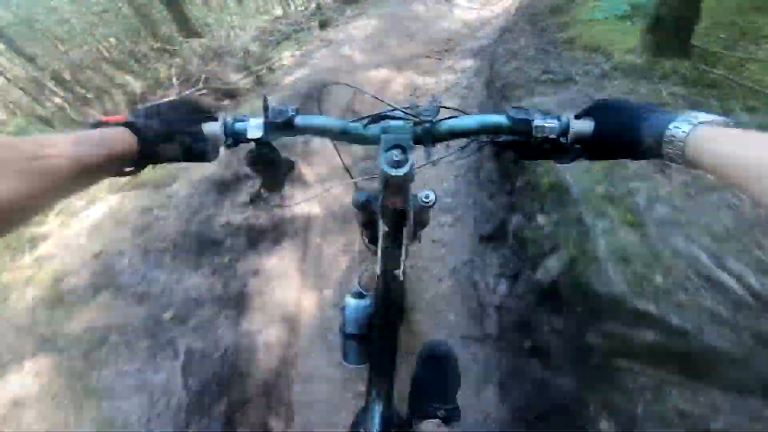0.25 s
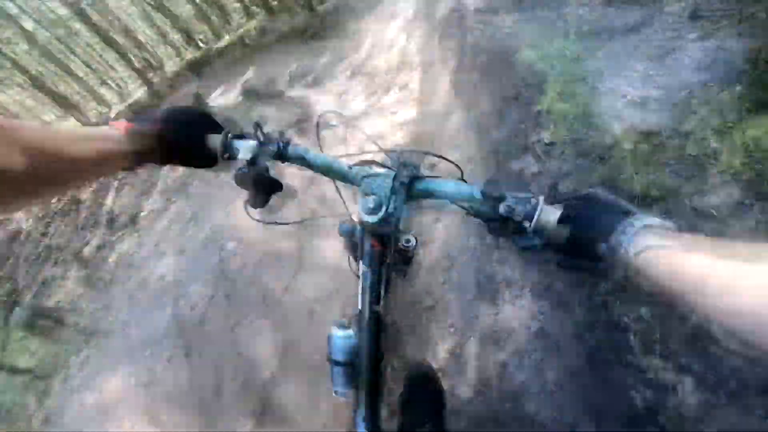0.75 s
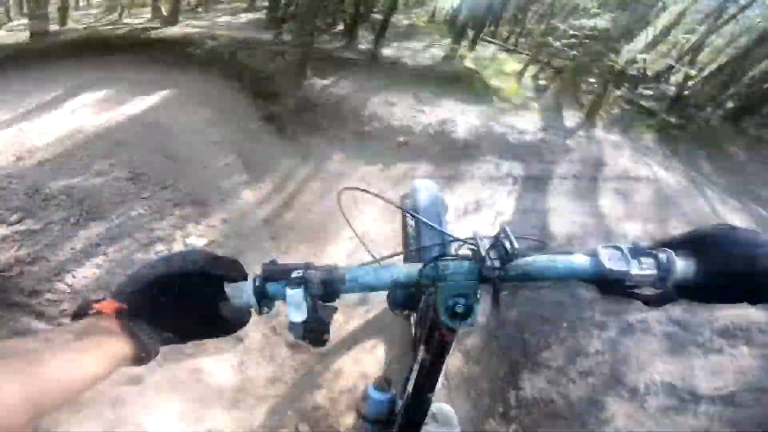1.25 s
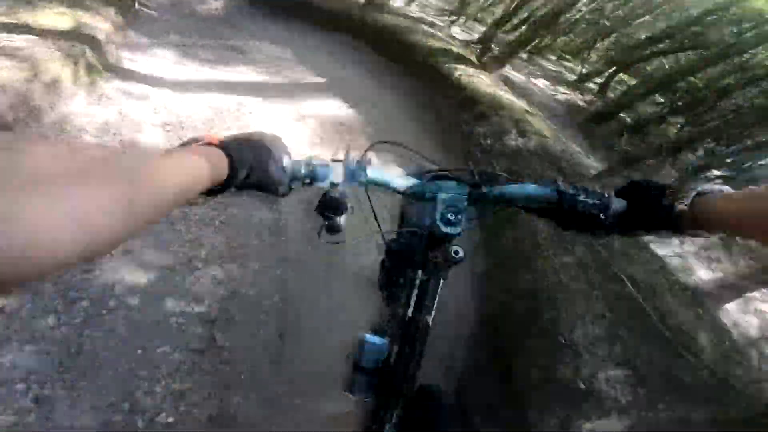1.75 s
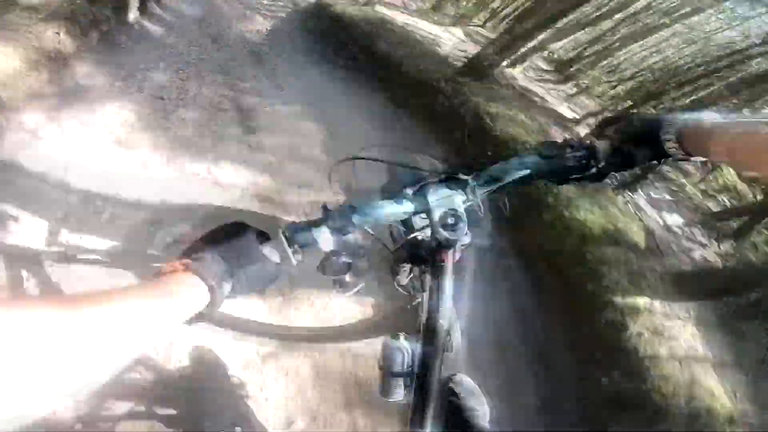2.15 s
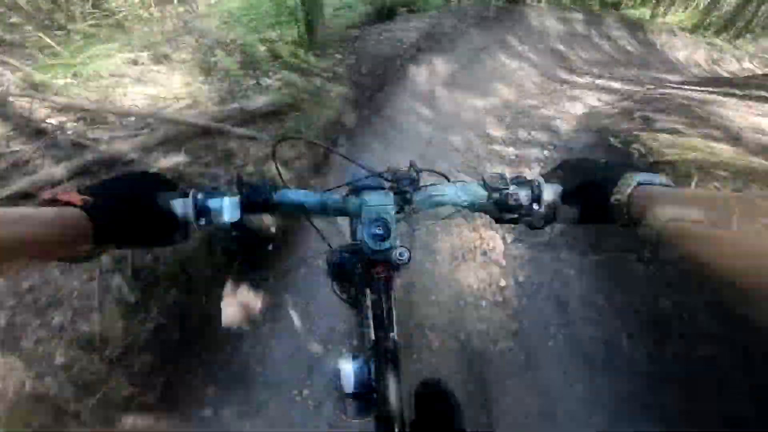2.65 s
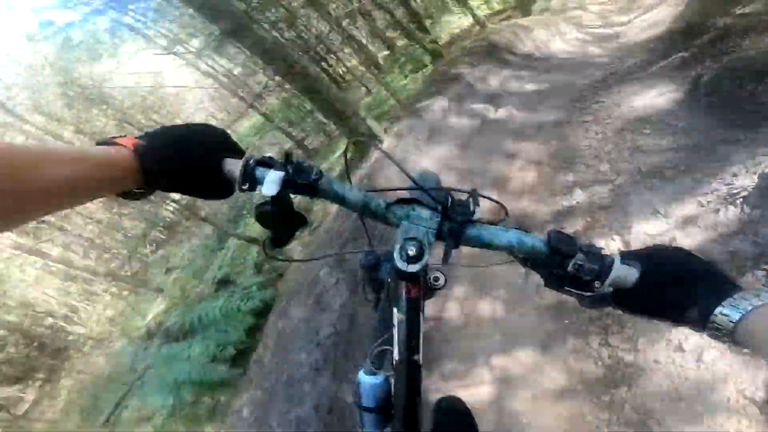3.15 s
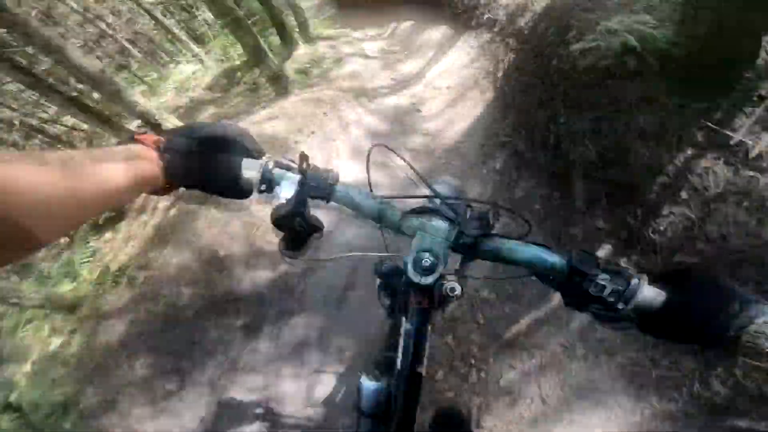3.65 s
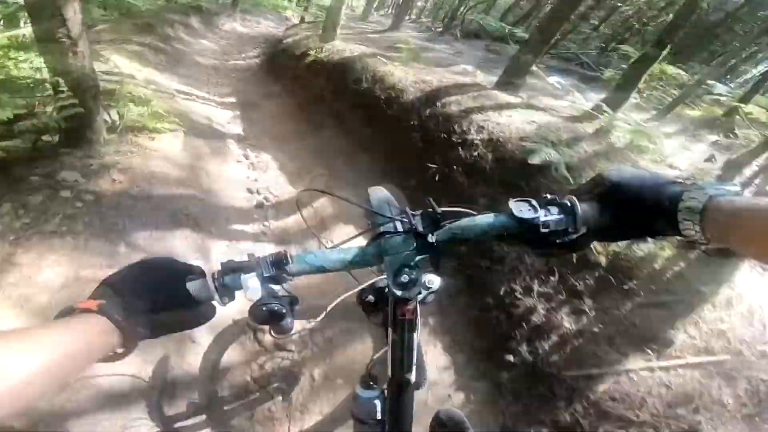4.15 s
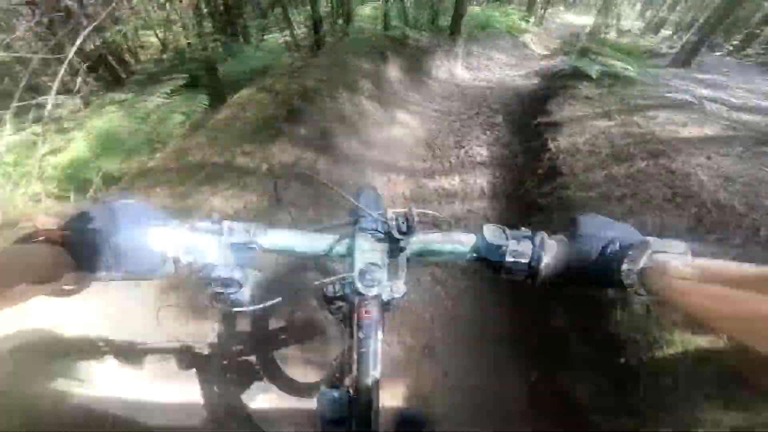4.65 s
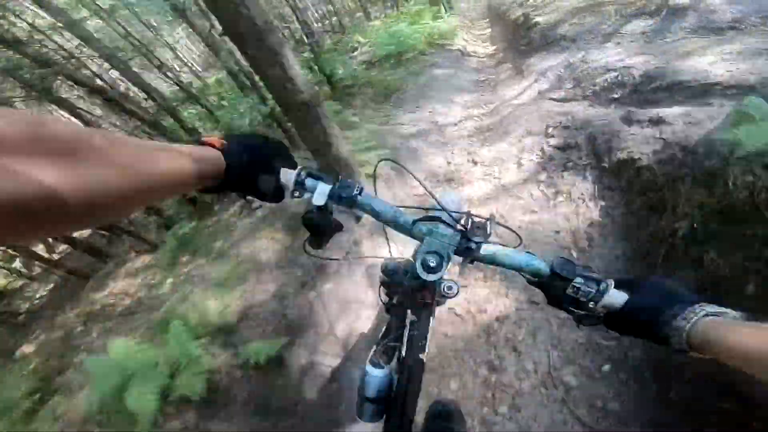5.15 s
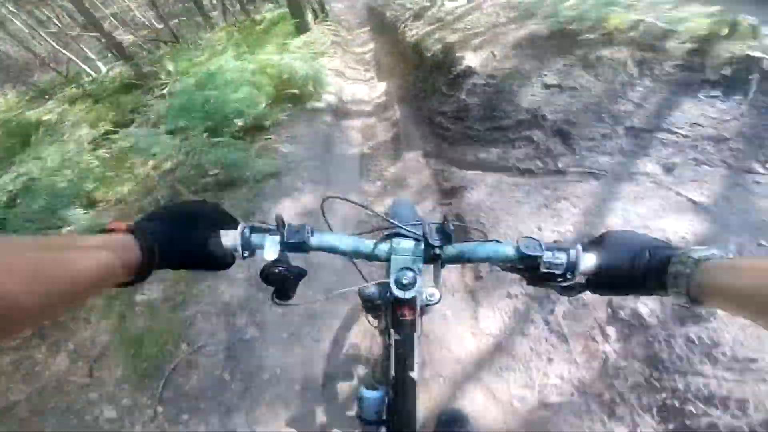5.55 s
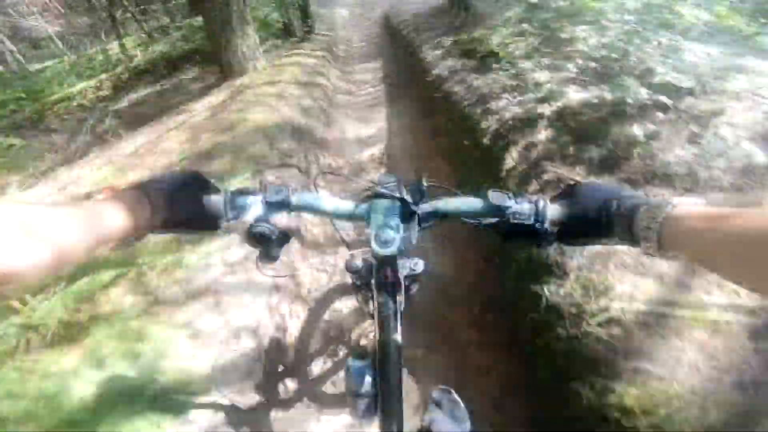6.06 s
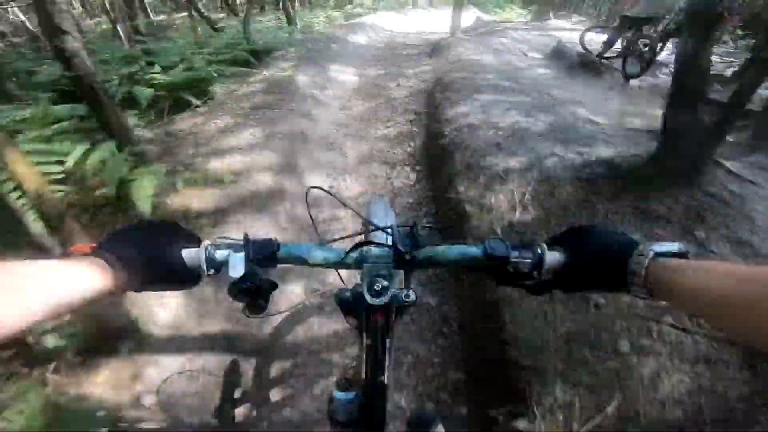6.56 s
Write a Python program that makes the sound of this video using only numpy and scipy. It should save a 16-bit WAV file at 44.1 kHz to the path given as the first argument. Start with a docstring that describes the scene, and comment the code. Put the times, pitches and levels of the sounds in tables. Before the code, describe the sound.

A mountain bike runs fast down a dry woodland trail, heard very close from the rider's chest, without echo. Low, fluttering wind rumble continues throughout, gusting at the start, around 1.8-3 s, 4.5 s and 6 s. Beneath it tyres drum and hum with gritty soil crunch. A sandy scrub and light knocks open; at 0.7-1.1 s sharp frame clacks, crunches and booming wheel hits cluster. From 1.4 to 2.4 s deep short thuds shake the camera, with rapid dry chatter and a low tyre growl in the bend. Around 2.7-3.6 s it is smoother, with wind and brief chatter. Chain and frame clatter returns at 3.75-3.95 s, then hard at 4.4-4.7 s with stones and a faint high brake-disc brush. After a short easing, 5.3-6.4 s brings dense metallic rattling, grit ticks, sandy spray and heavy thumps near 5.5 and 6.35 s, riding on to the end.

```python
"""A mountain bike runs fast down a dry woodland trail, heard from a camera on the rider's chest.
Its knobbly tyres drum, hum and crunch: random tiny impacts and stone clicks, shaped by filters.
Chain and frame clatter as short knocks and noise bursts; wheels boom and parts chatter in the bends.
Grit ticks, stones ping and pads brush the disc. Wind is low filtered noise swelling in gusts,
and bumps shake the camera with deep, short tones."""
import sys
import numpy as np
from scipy import signal
from scipy.fft import rfft, irfft
from scipy.io import wavfile
from scipy.ndimage import uniform_filter1d

SR = 44100
rng = np.random.default_rng(int(sys.argv[2]) if len(sys.argv) > 2 else 0)


def store_wav(level_fs):
    """Save 16-bit WAV to argv[1]."""
    pcm = np.round(np.clip(np.atleast_2d(level_fs), -1, 1) * 32767)
    wavfile.write(sys.argv[1], SR, pcm.T.astype(np.int16))


N = 299439
T = np.arange(N) / SR  # time of every sample, in seconds


def undb(db):
    """Turn decibels into a gain."""
    return 10 ** (np.asarray(db) / 20)


def curves(table):
    """Draw each column of a timed table as straight lines between its points, at every sample."""
    s, *columns = np.transpose(table)
    return [np.interp(T, s, column) for column in columns]


def value_at(s, table):
    """Read a two-column timed table at one moment."""
    return np.interp(s, *np.transpose(table))


def unit(x):
    """Scale to an average (rms) level of 1."""
    return x / np.sqrt(np.mean(x ** 2))


def steady(x, span_s):
    """Even out the slow level changes around an rms of 1, leaving the faster flutter."""
    k = max(int(span_s * SR), 2)
    power = uniform_filter1d(uniform_filter1d(x ** 2, k), k)
    return x / np.sqrt(np.abs(power) + 1e-18)


def walk(rate):
    """Wander between random levels, about `rate` new ones a second, with a spread of 1."""
    k = max(int(SR / rate), 2)
    steps = rng.standard_normal(N)[np.arange(N) // k]
    return unit(uniform_filter1d(steps, k))


def swell(start, hold_s, attack_s, release_s):
    """Gain that rises to 1 at start, holds, then dies away."""
    before = np.minimum(T - start, 0)
    after = np.maximum(T - start - hold_s, 0)
    return np.exp(before / attack_s - after / release_s)


def fade(t, t60):
    """Dying ring that drops by 60 dB in t60 seconds."""
    return np.exp(-np.log(1000) * t / t60)


def colour(x, points, size=4096):
    """Filter to the given (Hz, dB) outline; minimum phase, so nothing sounds before its cause."""
    hz, db = np.transpose(points)
    bins_hz = np.arange(size // 2 + 1) * SR / size
    log_gain = np.log(undb(np.interp(np.log(bins_hz + 1), np.log(hz), db)))
    cepstrum = irfft(log_gain)
    cepstrum[1:size // 2] *= 2
    cepstrum[size // 2 + 1:] = 0
    response = irfft(np.exp(rfft(cepstrum)))
    return signal.fftconvolve(x, response)[:len(x)]


def resonate(x, modes):
    """Ring a set of side-by-side resonances (Hz, width Hz, dB), with alternating signs."""
    out = 0
    for k, (hz, width, db) in enumerate(modes):
        b, a = signal.iirpeak(hz, hz / np.clip(width, 10, 2 * hz), fs=SR)
        out = out + (-1) ** k * undb(db) * signal.lfilter(b, a, x)
    return out


def grains(per_s, spread_db):
    """Scatter tiny one-sample impacts at random; their strengths differ by random decibels."""
    hit = rng.random(N) < per_s / SR
    size_db = spread_db * np.minimum(rng.exponential(size=N), 4)
    return hit * np.sign(rng.standard_normal(N)) * undb(size_db)


def scatter(t, t60, rise_s):
    """A contact breaks into a fast-dying spray of micro-impacts."""
    return rng.standard_normal(len(t)) * fade(t, t60) * (1 - np.exp(-t / rise_s))


def peak(x, db):
    """Scale a blow so that its loudest two milliseconds have this level."""
    return x * undb(db) / np.sqrt(uniform_filter1d(x ** 2, SR // 500).max())


def add(out, s, x):
    """Mix a short sound in at time s."""
    i = max(int(s * SR), 0)
    out[i:i + len(x)] += x[:N - i]


def pebbles(per_s, low_hz, high_hz, cycles, spread_db):
    """Stones click at random moments, each a short ring with its own pitch."""
    out, t = np.zeros(N), T[:SR // 50]
    for when, pitch, size, turn in rng.random((int(per_s * N / SR), 4)):
        hz = low_hz * (high_hz / low_hz) ** pitch
        ring = np.sin(2 * np.pi * (hz * t + turn)) * fade(t, cycles / hz) * (1 - np.exp(-hz * t))
        add(out, when * T[-1], ring * undb(spread_db * size ** 2))
    return unit(out)


# tone of the wind: (frequency [Hz], relative level [dB])
WIND_COLOUR = [(11, -56), (18, -13), (54, 0), (108, 1), (163, -3.5), (272, -16), (338, -23.5), (372, -29.5),
               (408, -27.5), (448, -37), (750, -54.5), (980, -63), (1650, -120)]
# steady air over the microphone, following the rider's speed and posture: (time [s], level [dB])
AIRFLOW = [(0, -20), (.45, -23), (.72, -29), (.95, -28.5), (1.15, -30.5), (1.3, -44.5), (1.665, -36),
           (1.72, -24.5), (2.1, -25.5), (2.4, -26), (3.25, -24), (4.1, -31), (4.45, -24), (4.95, -21),
           (5.3, -23.5), (5.72, -29), (6.02, -20), (6.79, -20)]
# gusts on top of it: (start [s], held for [s], level [dB])
GUSTS = [(0, 0.18, -16.5), (0.521, 0.058, -18.5), (1.819, 0.15, -16), (2.29, 0.038, -23.5),
         (2.48, .54, -16), (3.61, 0.096, -24), (4.54, 0.13, -12), (4.72, 0.11, -17.5), (5.06, 0.068, -18.5),
         (5.879, 0.071, -15.5), (6.1, 0.16, -17), (6.4, 0.35, -19)]
GUST_ATTACK_S, GUST_RELEASE_S = 0.03, 0.031


def wind():
    """Eddies shed by the rider press on the microphone; gusts rise out of the steady airflow."""
    air_db, = curves(AIRFLOW)
    power = undb(air_db) ** 2
    for s, hold, db in GUSTS:
        power = power + (undb(db) * swell(s, hold, GUST_ATTACK_S, GUST_RELEASE_S)) ** 2
    eddies = colour(rng.standard_normal(N), WIND_COLOUR) * undb(walk(40))
    buffeting = undb(walk(18))
    return steady(eddies, span_s=0.077) * np.sqrt(power) * buffeting


# bumps shaking the camera: (time [s], peak level [dB], pitch [Hz])
JOLTS = [(1.412, -26, 70), (1.507, -21, 62), (1.543, -20, 68), (1.637, -31, 85), (1.689, -21, 71),
         (1.741, -25, 66), (2.019, -13, 79), (2.139, -20.5, 84.5), (2.421, -16.5, 85)]
JOLT_T60_S = 0.05


def jolts():
    """A bump shakes the camera: a deep, fast-dying thud."""
    out, t = np.zeros(N), T[:SR // 5]
    for s, db, hz in JOLTS:
        thud = np.sin(2 * np.pi * hz * t) * fade(t, JOLT_T60_S) * (1 - np.exp(-t / 0.0063))
        add(out, s, peak(thud, db))
    return out


# pads brushing the brake disc: (start [s], held for [s], level [dB])
BRUSHES = [(4.527, .05, -46), (4.616, .035, -51)]
DISC_HZ, DISC_WIDTH_HZ = 4130, 330


def disc():
    """The brake pads brush the disc, and the rubbing noise makes it sing faintly."""
    rub = sum(undb(db) * swell(s, hold, 0.0054, 0.0091) for s, hold, db in BRUSHES)
    mode = [(DISC_HZ, DISC_WIDTH_HZ, 0)]
    song = resonate(resonate(rng.standard_normal(N), mode), mode)
    return unit(song) * rub


# single stones pinging off metal: (time [s], peak level [dB], pitch [Hz])
PINGS = [(1.508, -49, 6700), (2.527, -45, 4500), (4.912, -46, 5200)]
PING_WIDTH_HZ, PING_OVERTONE = 710, 1.8  # the overtone is a multiple of the pitch


def pings():
    """A single stone glances off metal and rings two high partials."""
    out, t = np.zeros(N), T[:SR // 10]
    for s, db, hz in PINGS:
        modes = [(hz, PING_WIDTH_HZ, 0), (hz * PING_OVERTONE, 1500, -6)]
        contact = scatter(t, t60=.008, rise_s=.0003)
        add(out, s, peak(resonate(resonate(contact, modes), modes), db))
    return out


# grit ticking on the bike: (time [s], peak level of the tick's main part [dB])
TICKS = [(1.339, -53.5), (2.522, -49.5), (2.621, -51), (2.965, -56), (3.927, -44), (4.031, -50),
         (4.509, -44), (4.548, -53), (4.567, -41), (4.948, -56), (4.991, -55), (5.469, -33), (5.65, -38),
         (5.705, -44), (5.94, -44.5), (6.278, -37.5), (6.349, -34.5), (6.379, -38.5), (6.528, -43.5),
         (6.701, -44.5)]
# tone of a tick: (frequency [Hz], relative level [dB])
TICK_COLOUR = [(2000, -12), (3400, -5), (4200, 1), (5200, -1.5), (6400, 4), (7200, -2.5), (8400, -4),
               (10000, -24), (11500, -59.5)]
# sparkle of a typical tick (before the treble curve is added), and its growth with strength
TICK_TYPICAL_DB, TICK_SPARKLE_DB, TICK_SPARKLE_DB_PER_DB = -45, -57.5, 0.86


def grit():
    """Sprays of small stones tick against the bike, with a sparkle that follows the treble curve."""
    out, t = np.zeros(N), T[:SR // 8]
    for s, db in TICKS:
        contact = scatter(t, t60=.04, rise_s=.002)
        sparkle_db = TICK_SPARKLE_DB + TICK_SPARKLE_DB_PER_DB * (db - TICK_TYPICAL_DB)
        sparkle_db += value_at(s, TOP_TREBLE)
        add(out, s, peak(colour(contact, TICK_COLOUR), db))
        add(out, s, peak(colour(contact, DUST_COLOUR), sparkle_db))
    return out


# runs of dry chatter through the bends:
# (start [s], strongest at [s], end [s], time between taps [s], peak level when strongest [dB])
CHATTER = [(1.400, 1.43, 1.66, .0283, -45.5), (2.712, 2.78, 2.87, .069, -45),
           (3.104, 3.225, 3.34, .0258, -41.5), (3.452, 3.452, 3.515, .0256, -48),
           (3.547, 3.547, 3.585, .025, -41)]
# tone of a tap: (frequency [Hz], relative level [dB])
CHATTER_COLOUR = [(450, -30), (780, -3), (1050, -9), (1380, 3), (1650, 1), (2000, -9), (2330, -4),
                  (2900, -19), (3950, -7), (4500, -13), (6000, -18), (8000, -48), (11000, -70)]
CHATTER_FADE_DB_PER_S = 34  # on both sides of the strongest moment
CHATTER_RISE_S, CHATTER_T60_S = .004, .02
CHATTER_JITTER_S, CHATTER_SCATTER_DB = .0006, .7


def chatter():
    """One part scuffs against another at a nearly even rate, swelling and fading as the bike leans."""
    out, t = np.zeros(N), T[:SR // 20]
    for start, strongest, end, period, db in CHATTER:
        for s in np.arange(start, end, period):
            late, harder = rng.standard_normal(2)
            tap = colour(scatter(t, CHATTER_T60_S, CHATTER_RISE_S), CHATTER_COLOUR)
            tap_db = db + CHATTER_SCATTER_DB * harder - CHATTER_FADE_DB_PER_S * abs(s - strongest)
            add(out, s + CHATTER_JITTER_S * late, peak(tap, tap_db))
    return out


# ring of frame and drivetrain: (frequency [Hz], width [Hz], level before random scatter [dB])
FRAME = [(880, 42, -0.5), (1320, 100, 1.5), (1680, 58, 9.5), (2250, 220, -0.5), (2983, 70, -3),
         (4170, 360, -11)]
MODE_SCATTER_DB = 2
# tones of the crack and of the clashing links: (frequency [Hz], relative level [dB])
CRACK_COLOUR = [(700, -29), (1400, -7.5), (2400, 9.5), (3200, -1), (4100, 3.5), (5000, -13.5), (8000, -35)]
STEEL_COLOUR = [(1800, -12.5), (2800, -0.5), (3400, 0.5), (4100, 11), (4800, 6), (6200, 3), (7200, -11),
                (8500, -20), (10500, -31.5), (13000, -38), (16000, -52.5)]


def knock(db, bright_db, hz, t60, crack_db):
    """A hard part hits its stop: a tock, a crack, ringing tubes and a bright clash of links."""
    t = T[:SR // 4]
    tock = np.sin(2 * np.pi * hz * t) * fade(t, 0.02) * (1 - np.exp(-t / 0.00044))
    crack = colour(scatter(t, t60=.012, rise_s=.0005), CRACK_COLOUR)
    contact = scatter(t, t60, rise_s=.0005)
    # each blow lands elsewhere, so it rings the tubes in a different balance
    modes = [(f, width, mode_db + MODE_SCATTER_DB * rng.standard_normal()) for f, width, mode_db in FRAME]
    body = unit(resonate(contact, modes)) + 0.55 * unit(colour(contact, CRUNCH_COLOUR))
    clash = colour(contact, STEEL_COLOUR)
    hard = peak(tock, db - 3.0) + peak(crack, db + crack_db - 12.0)
    return hard + peak(body, db + crack_db - 9.0) + peak(clash, db + bright_db - .5)


# chain and frame clattering on bumps; knock() sets each part of the blow a few dB lower:
# (time [s], strength [dB], brightness relative to it [dB], pitch of the struck part [Hz],
#  t60 of the clash [s], crack relative to the strength [dB])
CLATTERS = [(0.054, -39, -12, 800, 0.06, 10), (0.114, -46.5, 12, 1140, 0.095, -1),
            (0.273, -37, -7, 1600, 0.067, 1), (0.683, -43, -9, 1500, .04, 4),
            (0.734, -40.5, -10, 1190, 0.035, 0), (0.776, -45, -6, 1900, .025, -1),
            (0.798, -27.5, -6, 2020, 0.045, 3.5), (0.845, -31, -20, 1060, 0.034, -4),
            (0.884, -35.5, -12, 980, 0.027, -5), (0.951, -30.5, -16, 703, .06, -8),
            (0.956, -33, -16, 620, 0.059, -6), (1.042, -46, -8, 1280, 0.044, 2),
            (1.143, -50, -9, 1510, .07, 6), (1.199, -45, -13, 1200, .04, 3),
            (1.289, -45.5, -11, 1000, 0.14, -10), (1.628, -38.5, -2, 1650, 0.045, 5),
            (1.706, -39.5, -16, 1200, 0.094, 4), (1.748, -43.5, -5, 1390, 0.078, 4),
            (3.745, -36.5, -10, 790, 0.06, 1), (3.758, -35.5, -9, 910, 0.076, -4),
            (3.794, -42, -5, 2410, .07, 0), (3.815, -40.5, -8, 1404, 0.083, 6),
            (3.844, -30, -24, 854, 0.021, 5.5), (3.847, -28, -27, 830, 0.051, -6),
            (3.919, -35, -7, 1710, 0.095, 4.5), (3.951, -42, -7, 1310, .03, -1),
            (4.194, -46, -6, 834, .05, -6), (4.343, -46, 0.5, 1290, 0.04, 6),
            (4.433, -31.5, -5.5, 1660, 0.05, 2), (4.438, -33, -6, 1490, 0.062, 7),
            (4.472, -34, -7, 1060, 0.07, 4), (4.501, -36, -13, 1636, .04, 3),
            (4.511, -31, -20, 980, 0.032, 1), (4.526, -39, -17, 1900, .03, 1),
            (4.539, -41, -12, 1750, .03, -2), (4.551, -42, -14, 1130, .025, -4),
            (4.5763, -22, -24, 1200, 0.019, -15), (4.614, -34, -7, 860, 0.034, 1),
            (5.252, -45, -1.5, 1520, 0.03, 4), (5.315, -36.5, -3.5, 1100, 0.046, 4),
            (5.37, -33, -22, 945, 0.044, -15), (5.41, -37, 2, 780, 0.045, 4),
            (5.471, -20.5, -16, 1270, 0.03, -2), (5.487, -38, -10, 1110, .03, 3),
            (5.562, -39, -7, 1260, 0.032, 0), (5.604, -37.5, -2, 800, .04, 1),
            (5.661, -30, -5, 1040, 0.041, 3.5), (5.723, -36.5, -4, 1310, 0.029, -4),
            (5.773, -35.5, -7.5, 1550, 0.17, -3), (5.809, -42, -0.5, 1410, .06, -1),
            (5.944, -42.5, 0, 1530, 0.066, 8), (6.064, -37, -5, 1310, .05, 3),
            (6.079, -36, -6, 890, .04, 1), (6.117, -35.5, -2.5, 819, 0.03, 0),
            (6.216, -32, -6.5, 1400, 0.071, -2), (6.348, -31.5, -14, 890, 0.11, 1.5),
            (6.361, -35, -16, 1350, 0.037, -3)]
# lighter rattles fall at random, louder on looser ground
RATTLES_PER_S, RATTLE_OVER_GROUND_DB, RATTLE_SPREAD_DB, RATTLE_T60_S = 3.4, -1.5, 3, 0.074


def clatter():
    """Loose parts knock hard on the bumps; lighter rattles fall at random."""
    out = np.zeros(N)
    for s, db, bright_db, hz, t60, crack_db in CLATTERS:
        add(out, s, knock(db, bright_db, hz, t60, crack_db))
    for when, pitch, size in rng.random((int(RATTLES_PER_S * N / SR), 3)):
        s = when * T[-1]
        db = value_at(s, GROUND) + RATTLE_OVER_GROUND_DB + RATTLE_SPREAD_DB * (2 * size - 1)
        add(out, s, knock(db, bright_db=-3.5, hz=800 * 2 ** pitch, t60=RATTLE_T60_S, crack_db=-0.5))
    return out


# wheels striking roots and hollows: (time [s], peak level [dB])
THUMPS = [(0.809, -20.5), (0.949, -16), (1.288, -31), (1.424, -32), (1.498, -33), (4.576, -24),
          (4.665, -20), (5.45, -18), (5.472, -17), (6.346, -14.5)]
# ring of a struck tyre and rim: (frequency [Hz], t60 [s], relative level [dB])
WHEEL = [(223.4, 0.11, 1.5), (324, 0.049, 9), (398.4, 0.087, -3), (460, 0.013, -15), (634, 0.016, -18)]


def thumps():
    """A wheel hits an edge and booms as tyre and rim ring together."""
    out, t = np.zeros(N), T[:SR // 4]
    ring = sum(undb(db) * np.sin(2 * np.pi * hz * t) * fade(t, t60) for hz, t60, db in WHEEL)
    boom = ring * (1 - np.exp(-t / 0.0044))
    for s, db in THUMPS:
        add(out, s, peak(boom, db))
    return out


# side knobs growling on the banked turn: (start [s], held for [s], level [dB])
BERM = [(1.85, 0.48, -55), (2.5, 0.21, -50)]
BERM_HZ, BERM_WIDTH_HZ = 570, 280


def berm():
    """Leaned into the banking, the side knobs scrub with a low growl."""
    lean = sum(undb(db) * swell(s, hold, 0.035, 0.048) for s, hold, db in BERM)
    band = [(BERM_HZ, BERM_WIDTH_HZ, 0)]
    growl = resonate(resonate(grains(per_s=700, spread_db=2.0), band), band)
    return unit(growl) * lean


# stony stretches of trail:
# (start [s], end [s], stones per second [1/s], middle peak level [dB])
STONY = [(.18, .67, 50, -46), (.82, 1.32, 55, -44.5), (3.79, 3.97, 70, -44), (4.17, 4.42, 30, -49),
         (4.48, 4.62, 70, -42), (5.33, 5.9, 32, -41.5)]
# tone of a pinched stone: (frequency [Hz], relative level [dB])
STONE_COLOUR = [(300, -16), (700, 6.5), (1800, -2), (3000, -3.5), (4200, -2.5), (6000, -4), (9000, -41.5)]
STONE_T60_S, STONE_SPREAD_DB = .028, 2.5


def stones():
    """The tread pinches and spits small stones, each a short crunch with its own pitch."""
    out, t = np.zeros(N), T[:SR // 20]
    for start, end, per_s, db in STONY:
        slots = np.arange(start, end, 1 / per_s)
        for s, (late, pitch, size, gritty) in zip(slots, rng.random((len(slots), 4))):
            contact = scatter(t, STONE_T60_S, rise_s=.0015)
            hz = 850 * 3 ** pitch
            body = unit(resonate(colour(contact, STONE_COLOUR), [(hz, hz / 2, 0)]))
            spray = (0.23 + 0.55 * gritty) * unit(colour(contact, SAND_COLOUR))
            stone_db = db + STONE_SPREAD_DB * (2 * size - 1)
            add(out, s + late / per_s, peak(body + spray, stone_db))
    return out


# looseness of the ground, heard as crunch; it also guides the rattles: (time [s], level [dB])
GROUND = [(0, -37), (.25, -48.5), (.72, -50), (.9, -48.5), (1.18, -51.5), (1.4, -51), (1.7, -50),
          (1.98, -54.5), (2.25, -51.5), (2.75, -50.5), (3.05, -56), (3.62, -54.5), (3.74, -49.5),
          (3.88, -46), (4.2, -50), (4.58, -45), (4.78, -48.5), (5.06, -54), (5.26, -50), (5.45, -42.5),
          (6.0, -48.5), (6.33, -43.5), (6.79, -48.5)]
# tyres scrubbing over loose patches:
# (start [s], held for [s], crunch level [dB], sand hiss level [dB])
SCRUBS = [(0.018, 0.075, -68, -46), (.815, 0.055, -44, -57), (.952, 0.013, -46, -63),
          (1.04, 0.027, -49, -59), (1.137, 0.015, -41.5, -53), (3.92, 0.03, -45, -54),
          (4.398, 0.038, -47.5, -59), (4.502, 0.072, -39, -49), (5.335, 0.14, -67, -49),
          (5.63, 0.049, -47, -51), (6.212, 0.029, -44, -53), (6.33, 0.046, -47, -47)]
SCRUB_ATTACK_S, SCRUB_RELEASE_S = 0.014, 0.037
# how the top treble opens up along the run, for dust and ticks alike: (time [s], added level [dB])
TOP_TREBLE = [(0, -40), (1.2, -48), (1.65, -27), (2.0, -8), (2.7, 1.5), (6.79, 2.5)]
# tones of crunch (also in knocks), sand (also in stones) and dust (also in ticks):
# (frequency [Hz], relative level [dB])
CRUNCH_COLOUR = [(300, -23.5), (520, 10), (850, 5), (1050, 1.5), (1300, 5.5), (1500, 3), (1800, 2.5),
                 (2050, -3), (2600, -6.5), (3300, -11), (4500, -48)]
SAND_COLOUR = [(1800, -11.5), (2800, -12), (3550, -7), (3850, 0.5), (4130, 1), (4350, -2), (5300, -2.5),
               (6250, 0), (7000, -12), (8300, -15.5), (10000, -25), (11500, -59.5)]
DUST_COLOUR = [(6000, -53), (8000, 3.5), (9500, -3), (11200, -9.5), (12200, 11), (13200, 3), (14500, 9),
               (16000, -48)]
# sand and dust grow faster than the crunch as the ground loosens
FIRM_GROUND_DB, SAND_ON_FIRM_DB, SAND_DB_PER_DB = -54, -63.5, 1.3243
DUST_BELOW_SAND_DB = 13  # before the treble curve is added


def dirt():
    """Soil crunches, pebbles click and sand sprays under the tread, in spurts as the wheels skip."""
    ground_db, = curves(GROUND)
    top_db, = curves(TOP_TREBLE)
    crunch_gain = undb(ground_db)
    sand_gain = undb(SAND_ON_FIRM_DB + SAND_DB_PER_DB * (ground_db - FIRM_GROUND_DB))
    for s, hold, crunch_db, sand_db in SCRUBS:
        scrub = swell(s, hold, SCRUB_ATTACK_S, SCRUB_RELEASE_S)
        crunch_gain = np.hypot(crunch_gain, undb(crunch_db) * scrub)
        sand_gain = np.hypot(sand_gain, undb(sand_db) * scrub)
    dust_gain = sand_gain * undb(top_db - DUST_BELOW_SAND_DB)

    # limit the random dips, so the crunch stays continuous
    spurts = np.maximum(walk(70), -1)
    skips = np.maximum(walk(22), -1)

    soil = unit(grains(per_s=3000, spread_db=-1.5))
    sand = unit(grains(per_s=6200, spread_db=3.5) * undb(walk(160)))
    dust = grains(per_s=2100, spread_db=1.5)
    coarse = soil + 0.15 * pebbles(per_s=240, low_hz=741, high_hz=3415, cycles=43, spread_db=18.5)
    fine = sand + 0.3 * pebbles(per_s=420, low_hz=2986, high_hz=8870, cycles=310, spread_db=19.5)
    dust = dust + 0.08 * pebbles(per_s=70, low_hz=11500, high_hz=14500, cycles=90, spread_db=19)

    crunch = steady(colour(coarse * undb(3.06 * spurts), CRUNCH_COLOUR), span_s=0.073) * crunch_gain
    hiss = steady(colour(fine * undb(1.6 * spurts), SAND_COLOUR), span_s=0.16) * sand_gain
    sparkle = steady(colour(dust * undb(2.8 * spurts), DUST_COLOUR), span_s=.15) * dust_gain
    return (crunch + hiss + sparkle) * undb(0.61 * skips)


# load on the tyres: (time [s], level before the 2.5 dB trim below [dB])
LOAD = [(0, -32.5), (.12, -29), (.3, -37), (.58, -29.5), (.69, -39.5), (.83, -32), (1.1, -33),
        (1.35, -42.5), (1.6, -43), (1.78, -36), (2.3, -41), (2.7, -34.5), (3.45, -41.5), (3.82, -32),
        (4.1, -36.5), (4.4, -38.5), (4.65, -30.5), (4.85, -39.5), (5.0, -37.5), (5.22, -34), (5.46, -26.5),
        (5.72, -32.5), (6.28, -27), (6.79, -38)]
# tread knobs meeting hard ground:
# (time [s], middle knob rate [Hz], hum against casing before the 7 dB trim below [dB])
TREAD = [(0, 350, 4.5), (.7, 324.3, -13), (.82, 326.4, 3), (1.0, 362, 8.5), (1.2, 352, 3), (1.4, 353.4, 8),
         (1.75, 349, -16), (2.5, 341.8, 3.5), (4.3, 336.3, -15.5), (5.5, 318.3, -7.5), (6.3, 344, 6.5),
         (6.79, 344, 10)]
# tone of the drumming casings: (frequency [Hz], relative level [dB])
CASING_COLOUR = [(120, -42.5), (200, 8.5), (270, 6.5), (345, 7), (420, 1), (500, -5.5), (700, -27.5),
                 (1100, -65.5)]
KNOB_SLIP_RAD = .6  # random slips in the hum's phase


def tyres():
    """Rough ground drums the casings; the tread knobs add a wavering hum."""
    load_db, = curves(LOAD)
    knob_hz, hum_db = curves(TREAD)
    drum = steady(colour(grains(per_s=900, spread_db=3.5), CASING_COLOUR), span_s=0.1)
    wavering_hz = knob_hz * (1 + 0.0404 * walk(60))
    phase = 2 * np.pi * np.cumsum(wavering_hz) / SR
    hum = unit(np.sin(phase + KNOB_SLIP_RAD * walk(90)) * undb(3.0 * walk(40)))
    return (drum + undb(hum_db - 7.0) * hum) * undb(load_db - 2.5)


def scene():
    """Everything is close and dry in the open wood, so the layers are simply added."""
    surroundings = wind() + jolts()
    small_parts = disc() + pings() + grit() + chatter() + clatter()
    wheels = thumps() + berm() + stones() + dirt() + tyres()
    return (surroundings + small_parts + wheels)[None]


def record(dry):
    """The camera rounds off the strongest buffets and cuts the treble above 15.7 kHz."""
    ceiling = 0.74
    rounded = ceiling * np.tanh(dry / ceiling)
    low_pass = signal.ellip(10, .2, 80, 15700, fs=SR, output="sos")
    return signal.sosfilt(low_pass, rounded)


dry = scene()
out = record(dry)
store_wav(out)
```